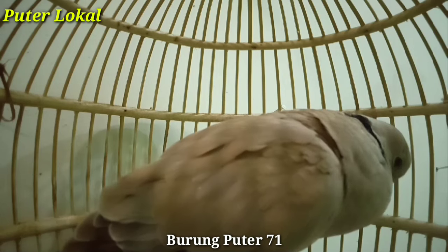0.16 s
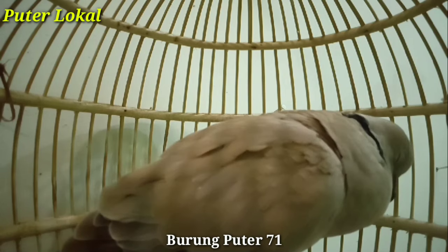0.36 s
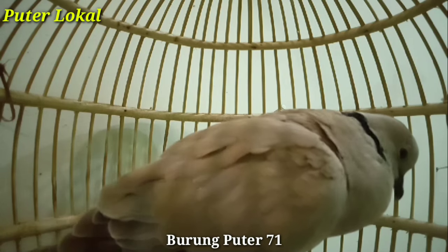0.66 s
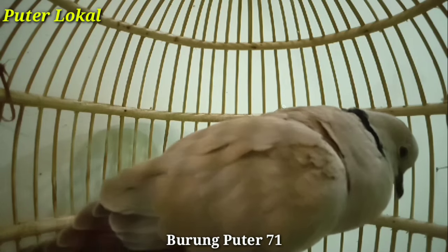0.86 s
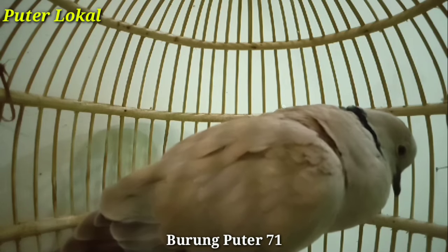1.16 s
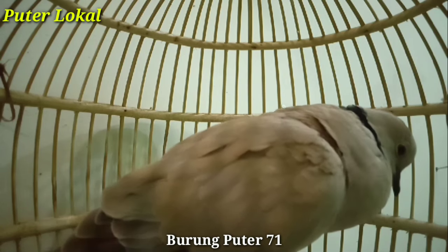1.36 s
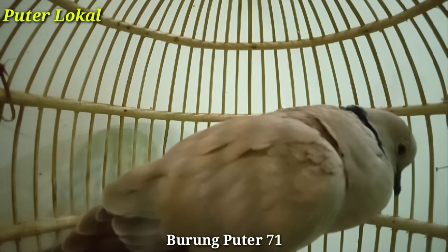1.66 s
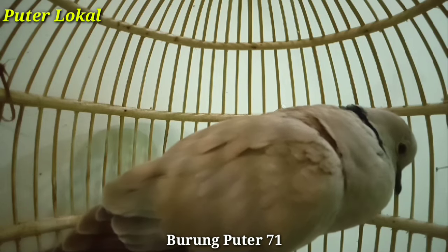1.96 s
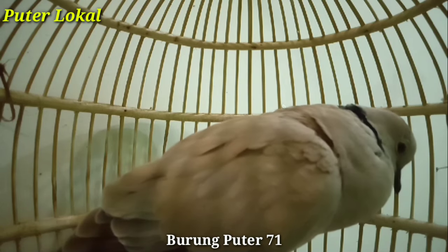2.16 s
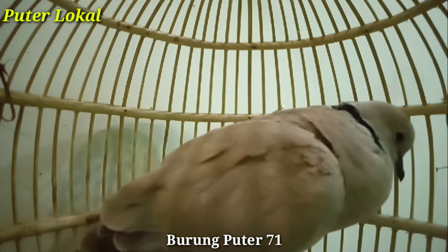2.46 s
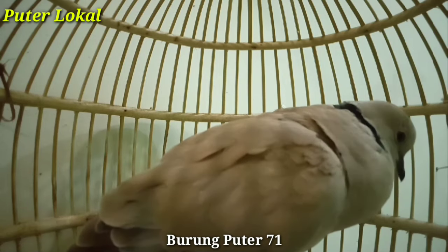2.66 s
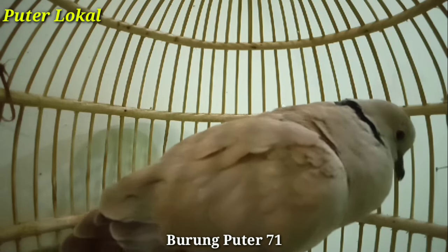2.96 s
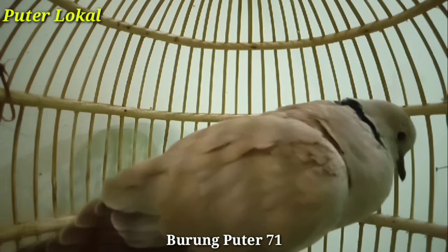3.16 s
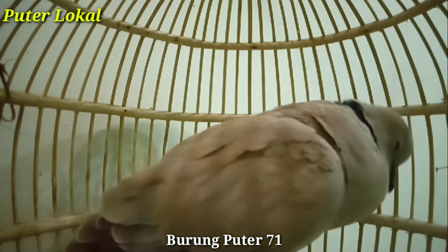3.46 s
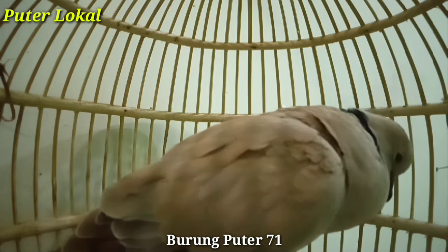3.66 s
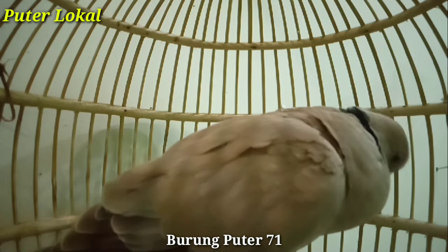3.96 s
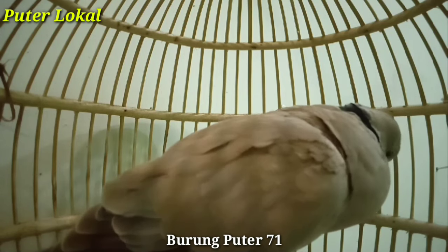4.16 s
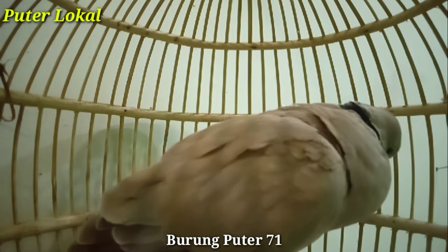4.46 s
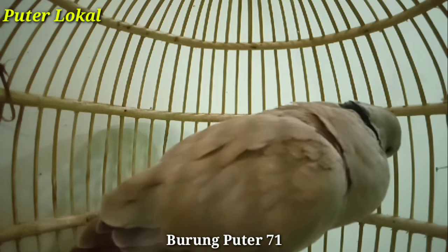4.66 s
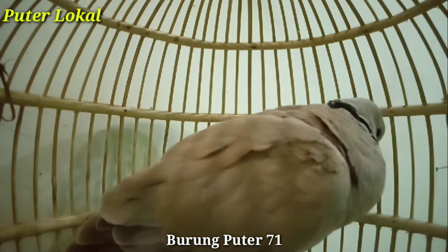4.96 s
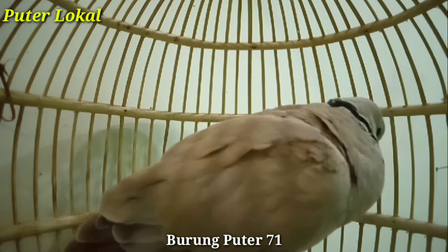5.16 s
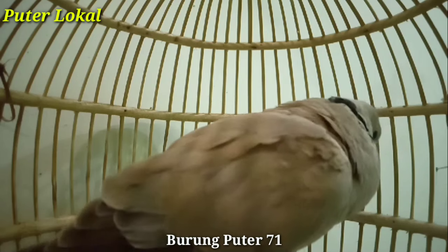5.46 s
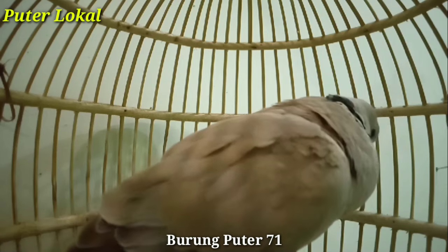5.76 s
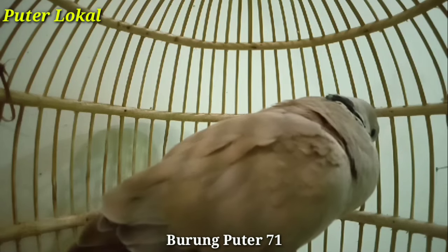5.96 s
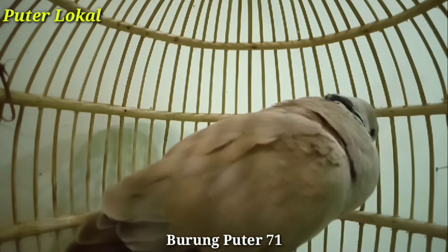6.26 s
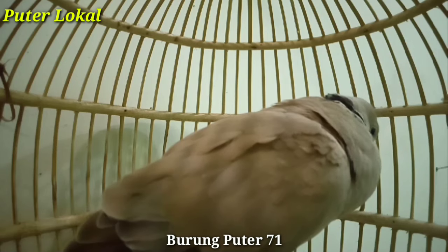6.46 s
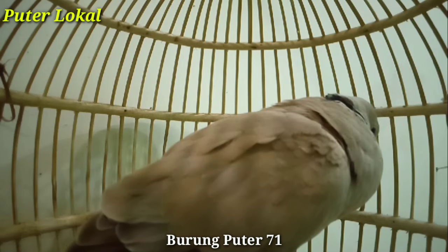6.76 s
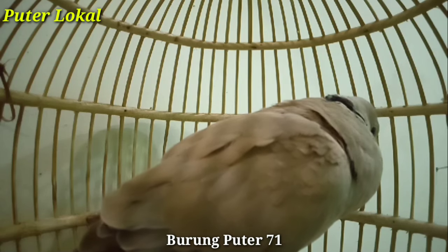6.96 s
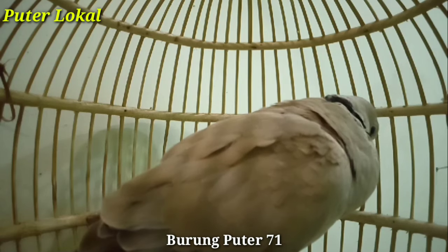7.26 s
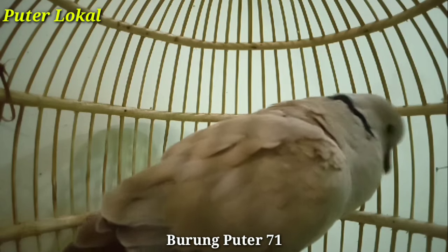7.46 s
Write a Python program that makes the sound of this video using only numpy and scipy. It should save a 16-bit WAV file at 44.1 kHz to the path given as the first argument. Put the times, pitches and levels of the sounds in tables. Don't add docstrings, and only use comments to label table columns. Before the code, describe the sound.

A caged collared dove coos three times close by, each a short note, rolled trill and long falling note, over faint room hiss.

```python
import sys
import numpy as np
from scipy import signal
from scipy.fft import rfft, irfft
from scipy.io import wavfile
from scipy.ndimage import uniform_filter1d

SR = 44100
rng = np.random.default_rng(int(sys.argv[2]) if len(sys.argv) > 2 else 0)


def master(y):
    cut = np.clip(np.atleast_2d(y).T, -1, 1)
    pcm = np.round(cut * 32767)
    wavfile.write(sys.argv[1], SR, pcm.astype(np.int16))


def gain_from_db(level_db):
    decades = np.asarray(level_db, float) / 20
    return 10 ** decades


N = 334702
LEAD = SR


def clock():
    return np.arange(-LEAD, N) / SR


def rms_one(x):
    return x / np.sqrt(np.mean(x ** 2) + 1e-20)


def smooth(x, seconds):
    size = max(int(seconds * SR), 1)
    return uniform_filter1d(uniform_filter1d(x, size=size), size=size)


def drift(rate_hz):
    r = np.exp(-2 * np.pi * rate_hz / SR)
    wander = signal.lfilter([1], [1, -2 * r, r * r], rng.standard_normal(N + 2 * LEAD))
    return rms_one(wander[LEAD:])


def band(low_hz, high_hz, size):
    edges = np.clip([low_hz, high_hz], 15, .45 * SR)
    sos = signal.butter(2, edges, "band", fs=SR, output="sos")
    return rms_one(signal.sosfilt(sos, rng.standard_normal(size)))


def phrase(tables, edge_s):
    rows = []
    for table in tables:
        first, last = table[0], table[-1]
        rows += [(first[0] - edge_s, first[1], -90), *table, (last[0] + edge_s, last[1], -90)]
    s, hz, db = np.transpose(sorted(rows))
    return np.interp(clock(), s, hz), gain_from_db(np.interp(clock(), s, db))


# opens in seconds, shuts in seconds, opening left afterwards from 0 to 1.
GATE_SPANS = [
    (-1.4, .41, .25),
    (.825, 2.585, .27),
    (3.17, 4.6, .14),
    (5.44, 7.07, .16),
]
GATE_FIRST, GATE_WIDEST, GATE_LAST = .73, .99, .76
GATE_WIDEST_AT, GATE_EDGE_S = .6, .035


def gate():
    rows, before = [], 0
    for opens, shuts, left in GATE_SPANS:
        rows += [(opens - GATE_EDGE_S, before), (opens + GATE_EDGE_S, GATE_FIRST),
                 (opens + GATE_WIDEST_AT * (shuts - opens), GATE_WIDEST),
                 (shuts - GATE_EDGE_S, GATE_LAST), (shuts + GATE_EDGE_S, left)]
        before = left
    return np.interp(np.arange(N) / SR, *np.transpose(rows))


# pitch in Hz, level in dB per Hz.
FLOOR = [(15, -53), (30, -26.5), (42, -12.5), (60, -5), (92, -4.5), (145, -4.5), (190, -9), (330, -10.5),
         (880, -16), (3540, -22.5), (5280, -35), (7860, -29), (9400, -37.5), (13500, -39.5), (15500, -34.5)]
FLOOR_DB, GATE_BASS_DB, GATE_TREBLE_DB = -63.5, 5.5, 7


def floor():
    hz = np.fft.rfftfreq(N, 1 / SR) + 1
    points_hz, points_db = np.transpose(FLOOR)
    colour = gain_from_db(np.interp(np.log(hz), np.log(points_hz), points_db))
    spectrum = rfft(rng.standard_normal(N)) * colour
    level = gain_from_db(FLOOR_DB) / np.std(irfft(spectrum, N))
    treble = 1 / (1 + (700 / hz) ** 2)
    opening = gate()
    bass_gain = gain_from_db(GATE_BASS_DB * opening + 1.5 * drift(2)[:N])
    treble_gain = gain_from_db(GATE_TREBLE_DB * opening + .6 * drift(8)[:N])
    low = bass_gain * irfft(spectrum * (1 - treble), N)
    high = treble_gain * irfft(spectrum * treble, N)
    return level * (low + high)


# pitch in Hz, width in Hz, level in dB.
RUMBLE_PEAKS = [
    (65, 7.4, -69),
    (142, 22, -71.5),
    (232, 12, -74),
]


def rumble():
    return sum(gain_from_db(db) * band(hz - width_hz / 2, hz + width_hz / 2, size=N)
               for hz, width_hz, db in RUMBLE_PEAKS)


# time in seconds, swells counted so far.
THROBS = [(.03, 0), (3.456, 12), (4.275, 15), (7.76, 27)]
INSECT_HZ, INSECT_WIDTH_HZ, INSECT_DB = 7800, 900, -75


def insect():
    throb = np.cos(np.pi * np.interp(np.arange(N) / SR, *np.transpose(THROBS))) ** 2
    chirr = band(INSECT_HZ - INSECT_WIDTH_HZ / 2, INSECT_HZ + INSECT_WIDTH_HZ / 2, size=N)
    return gain_from_db(INSECT_DB + 1.5 * drift(2)[:N]) * throb * chirr


# start in seconds, length in seconds, pitch in Hz, level in dB.
MOTOR = [
    (0, .65, 68, -66.5),
    (1.455, 1.2, 70.8, -60),
    (5.753, .27, 232, -61.5),
    (6.215, .24, 232.6, -61),
    (6.8, .78, 228, -69.5),
]
# start in seconds, length in seconds, start pitch in Hz, end pitch in Hz, level in dB.
FAR = [(0.485, 0.11, 900, 877, -59), (0.495, .22, 1020, 970, -65.5), (0.553, 0.097, 435, 428.4, -61),
       (4.384, 0.19, 930, 1005, -58), (4.5, 0.089, 1130, 1124, -63), (4.6, 0.17, 1000, 992, -69),
       (5.04, .05, 1250, 1237, -60.5), (5.09, .22, 1230, 1224, -72), (7.116, 0.088, 890, 910, -67),
       (7.127, 0.079, 1100, 1090, -67), (7.163, 0.13, 620, 694, -60.5), (7.23, 0.15, 505, 561, -64),
       (7.389, .1, 600, 688, -62.5), (7.5, 0.069, 490, 477, -63), (7.03, .15, 1950, 2008, -70),
       (0.868, .035, 3612, 3735, -61.5), (.975, 0.041, 3773, 3806, -65.5)]
WAVER_SHARE, WAVER_MAX_HZ = .036, 50


def far_calls():
    out, waver, flutter = np.zeros(N + LEAD), drift(70), gain_from_db(3.3 * drift(32))
    steady = [(s, length, hz, hz, db) for s, length, hz, db in MOTOR]
    for s, length, hz, end_hz, db in FAR + steady:
        rough_hz = min(WAVER_SHARE * hz, WAVER_MAX_HZ)
        at = LEAD + int(s * SR)
        u = np.linspace(0, 1, int(length * SR))[:len(out) - at]
        here = slice(at, at + len(u))
        pitch = hz + (end_hz - hz) * u + rough_hz * waver[here]
        tone = np.sin(2 * np.pi * np.cumsum(pitch) / SR)
        swelling = np.sin(np.pi * u) ** 0.51
        out[here] += gain_from_db(db + 2.5) * flutter[here] ** min(rough_hz / 20, 1) * swelling * tone
    return out


# start in seconds, length in seconds, start pitch in Hz, end pitch in Hz, level in dB.
HUM_CALLS = [
    (0.175, .315, 163, 141.5, -46.5),
    (2.375, .225, 162, 141, -45),
    (4.585, .115, 151, 134, -54),
    (6.955, .185, 165, 131, -50),
]
HUM_ATTACK_S, HUM_START_DB, HUM_FADE_DB, HUM_BEND = .025, -9, -12, 1.7


def hum_rows(s, length, hz, end_hz, db):
    t = np.append(0, np.linspace(HUM_ATTACK_S, length, num=6))
    level = db + HUM_FADE_DB * t / length + HUM_START_DB * (t == 0)
    pitch = end_hz + (hz - end_hz) * (1 - t / length) ** HUM_BEND
    return list(zip(s + t, pitch, level))


# pitch in Hz, level in dB.
HUM_THROAT = [(140, -16.5), (300, -9.5), (430, -3.5), (600, 1.5), (750, -12.5), (900, -25.5), (1500, -33.5)]


def hum():
    hz, gain = phrase([hum_rows(*call) for call in HUM_CALLS], edge_s=0.0081)
    unsteady = drift(40)
    phase = 2 * np.pi * np.cumsum(hz * (1 + 0.011 * unsteady)) / SR
    throat_hz, throat_db = np.transpose(HUM_THROAT)
    stack = sum(gain_from_db(np.interp(k * hz, throat_hz, throat_db)) * np.sin(k * phase + k * k) for k in range(1, 11))
    return np.sqrt(2) * smooth(gain, .012) * gain_from_db(3.0 * unsteady[::-1]) * stack


# start in seconds, peak in dB, centre in Hz, width in Hz, time to fall 60 dB in seconds.
CLINKS = [(.255, -61.5, 14500, 4000, 0.59), (.256, -66, 8500, 3000, 0.8), (.80, -69.5, 7800, 2500, 1.4),
          (1.286, -64.5, 7300, 900, 1.2), (1.425, -65, 8400, 1950, .9), (1.56, -60.5, 14800, 2990, 0.45),
          (2.591, -59.5, 7300, 1966, 0.16), (3.17, -77, 6000, 626, 0.33), (3.47, -68.5, 7000, 2950, 0.82),
          (3.978, -62, 8700, 1963, 1.1), (5.348, -64, 7500, 1197, 1.3), (5.35, -79.5, 14800, 2460, .6),
          (5.523, -62, 7200, 2466, 1.02), (6.01, -70, 14500, 3100, 0.9), (7.47, -62.5, 7600, 2510, 1.8),
          (7.475, -66.5, 14500, 4040, 0.69), (2.43, -69, 11000, 8000, .4), (1.76, -71.5, 6800, 580, .9),
          (3.79, -71, 14000, 3000, .3), (.87, -71, 6000, 500, .5), (2.592, -62, 3020, 1200, .4)]


def clinks():
    out, t = np.zeros(N + SR), np.arange(SR) / SR
    for s, db, hz, width_hz, t60 in CLINKS:
        decay = np.minimum(t / .003, 1) * gain_from_db(db - 60 * t / t60)
        at = int(s * SR)
        out[at:at + SR] += decay * band(hz - width_hz / 2, hz + width_hz / 2, size=SR)
    return out[:N]


SCOOP_HZ, SCOOP_DB, SCOOP_S, SHOULDER_SHARE, SHOULDER_DB = 427, -15, .023, .7, -1.2
PEAK_BASE_HZ, PEAK_DELAY_HZ_PER_S = 500, 1300
SETTLE_S, UNDERSHOOT, CUT_S, CUT_DB = .085, .26, .008, -7.5


def short_note(s, length, peak_hz, end_hz, db):
    top = s + (peak_hz - PEAK_BASE_HZ) / PEAK_DELAY_HZ_PER_S
    shoulder_hz = SCOOP_HZ + SHOULDER_SHARE * (peak_hz - SCOOP_HZ)
    return [(s + 0.00055, .85 * SCOOP_HZ, db + SCOOP_DB - 1.5),
            (s + 0.004, 1.1 * SCOOP_HZ, db + SCOOP_DB + 3),
            (s + SCOOP_S, shoulder_hz, db + SHOULDER_DB),
            (top, peak_hz, db),
            (top + SETTLE_S, end_hz - UNDERSHOOT * (peak_hz - end_hz), db),
            (s + length - CUT_S, end_hz, db - 1.8),
            (s + length, end_hz, db + CUT_DB)]


# share of its pulses gone, opening pitch in Hz,
# dip pitch in Hz, dip level in dB, end level in dB.
ROLL = [(0, 485, 428, -39.5, -41.5), (.125, 478, 433, -31, -25.5), (.375, 496, 456, -27.5, -21.5),
        (.75, 531, 465, -24.5, -15.5), (.875, 532, 462, -24, -11.5), (1, 537, 450, -25, -26.5)]


def swell(pulses):
    share, *columns = np.transpose(ROLL)
    place = np.linspace(0, 1, len(pulses))
    hz, dip_hz, dip_db, end_db = [np.interp(place, share, c) for c in columns]
    s, db = np.transpose(pulses)
    return list(zip(s, hz, dip_hz, db, dip_db, end_db))


def trill_rows(pulses, end_s, end_hz):
    tables = []
    following = [p[:2] for p in pulses[1:]] + [(end_s, end_hz)]
    for (s, hz, dip_hz, db, dip_db, end_db), (stop, next_hz) in zip(pulses, following):
        sag = s + min(.036, .6 * (stop - s))
        tables.append([(s + 0.0018, hz + 15, db - 0.5),
                       (s + 0.0038, hz, db),
                       (s + 0.71 * (sag - s), dip_hz + 6, (db + dip_db) / 2),
                       (sag, dip_hz, dip_db),
                       (max(stop - .21 * (stop - s), sag + .001), next_hz, end_db),
                       (stop - .007, next_hz + 10, end_db - 5)])
    return tables


# share of length, share of peak pitch, level in dB.
EMPTYING = [(0, .85, -15), (.045, .95, -4), (.1, 1.001, 0.3), (.4, .97, -.6), (.7, .931, -2.5),
            (.78, .892, -7), (.86, .845, -13.5), (.945, .775, -15.5), (.99, .64, -36)]
# pitch in Hz, level in dB.
STANDING = [(498, -2.2), (510, .6), (519.5, -7), (524.5, 0.3), (530, -4), (536, 0.4), (548, -.6)]


def long_note(s, length, hz, db):
    share, pitch, fall_db = np.transpose(EMPTYING)
    u = np.union1d(share, np.linspace(share[2], share[4], num=40))
    pitch = hz * np.interp(u, share, pitch)
    standing_db = (u >= share[2]) * np.interp(pitch, *np.transpose(STANDING))
    level = db + np.interp(u, share, fall_db) + standing_db
    return list(zip(s + u * length, pitch, level))


CROP_HZ, CROP_WIDTH_HZ, CROP_RING_HZ = 561.6, 105, 96


def crop(source, hz):
    r, w = np.exp(-np.pi * CROP_RING_HZ / SR), 2 * np.pi * CROP_HZ / SR
    b = (1 - r * r) / 2 * np.array([1, 0, -1])
    a = [1, -2 * r * np.cos(w), r * r]
    detune = (hz - CROP_HZ ** 2 / hz) / CROP_RING_HZ
    return signal.lfilter(b, a, source * np.sqrt(1 + detune ** 2))


# start in seconds, length in seconds, peak pitch in Hz, end pitch in Hz, level in dB.
SHORT_NOTES = [
    (0.845, .198, 587, 551, -14),
    (3.152, .208, 551, 532, -13.2),
    (5.476, .22, 548, 532.7, -14),
]
# pulse start in seconds, opening level in dB.
TRILLS = [
    [(1.204, -38.5), (1.242, -26), (1.29, -20), (1.345, -16.5), (1.394, -14.5), (1.455, -13.5),
     (1.513, -12), (1.584, -11), (1.679, -11)],
    [(3.488, -35.5), (3.524, -28), (3.578, -24), (3.626, -17.5), (3.677, -16.5), (3.728, -13),
     (3.789, -11.5), (3.856, -11.5), (3.94, -10.5)],
    [(5.803, -36), (5.855, -29), (5.904, -26), (5.962, -19.5), (6.013, -18), (6.07, -16.5), (6.126, -15.5),
     (6.195, -13), (6.292, -12.5)],
]
# start in seconds, length in seconds, peak pitch in Hz, level in dB.
LONG_NOTES = [
    (-.53, .61, 526, -10.5),
    (1.722, .588, 537, -10.5),
    (3.985, .505, 545, -9.5),
    (6.325, .575, 544, -11),
]
# pitch in Hz, level in dB against the fundamental.
WINDPIPE = [(680, -27.5), (850, -40.5), (1080, -45), (1300, -44.5), (1620, -35.5), (1760, -38), (1920, -40),
            (2200, -50), (2600, -58), (3000, -76)]


def coo():
    long_notes = [long_note(*note) for note in LONG_NOTES]
    tables = long_notes + [short_note(*note) for note in SHORT_NOTES]
    for pulses, note in zip(TRILLS, long_notes[1:]):
        tables += trill_rows(swell(pulses), *note[0][:2])
    hz, gain = phrase(tables, edge_s=.002)
    hz = smooth(hz, .004) * (1 + .002 * drift(25))
    gain = np.sqrt(2) * smooth(gain, 0.0021)
    phase = 2 * np.pi * np.cumsum(hz) / SR

    pop = sum(gain_from_db(12) * np.exp(-((clock() - note[0]) / .012) ** 2) for note in SHORT_NOTES)
    off_crop = np.minimum(np.sqrt(1 + ((hz - CROP_HZ) / CROP_WIDTH_HZ) ** 6), gain_from_db(9)) + pop
    pipe_hz, pipe_db = np.transpose(WINDPIPE)
    overtones = 0
    for k in range(2, 6):
        level_db = np.interp(k * hz, pipe_hz, pipe_db) - 5.5 * (k > 3) + 1.8 * drift(6.7)
        overtones = overtones + gain_from_db(level_db) * np.sin(k * phase)

    crop_floor = signal.butter(2, 300, "high", fs=SR, output="sos")
    fundamental = signal.sosfilt(crop_floor, crop(gain * np.sin(phase), hz))
    return fundamental, smooth(gain, 0.0047) * off_crop * overtones


ROOM_T60_S, WET_DB, OVERTONE_WET_DB, FAR_WET_DB = .52, -11, -7, -8


def room(x):
    t = np.arange(SR) / SR
    build_up = np.clip((t - .006) / 0.028, 0, 1)
    echoes = rng.standard_normal(SR) * gain_from_db(-60 * t / ROOM_T60_S) * build_up
    return signal.fftconvolve(x, echoes / np.sqrt(np.sum(echoes ** 2)))[:len(x)]


def scene():
    fundamental, overtones = coo()
    near, far = fundamental + hum(), far_calls()
    into_room = gain_from_db(WET_DB) * near + gain_from_db(OVERTONE_WET_DB) * overtones + gain_from_db(FAR_WET_DB) * far
    wet = room(into_room) * gain_from_db(1.2 * drift(8))
    echoing = (near + overtones + far + wet)[LEAD:]
    return (echoing + clinks() + insect() + floor() + rumble())[None]


def top_cut(x):
    return signal.sosfilt(signal.butter(12, 16650, fs=SR, output="sos"), x)


def record(dry):
    cut = irfft(rfft(dry) * (np.fft.rfftfreq(N, 1 / SR) < 15520), N)
    return top_cut(cut)


dry = scene()
out = record(dry)
master(out)
```